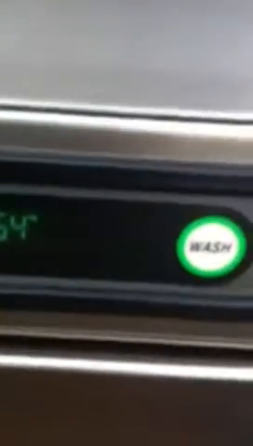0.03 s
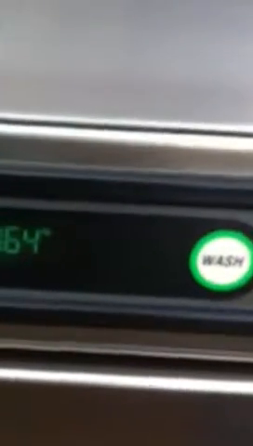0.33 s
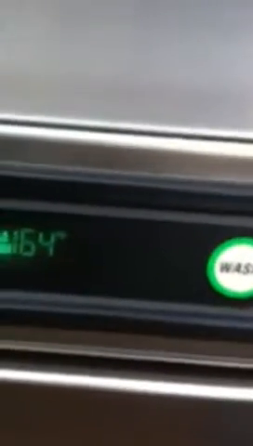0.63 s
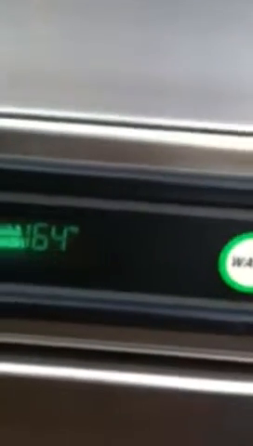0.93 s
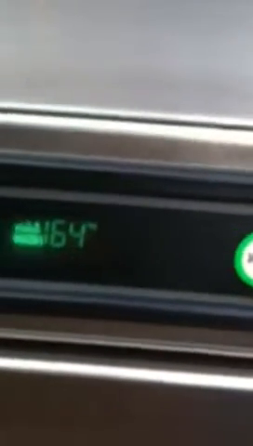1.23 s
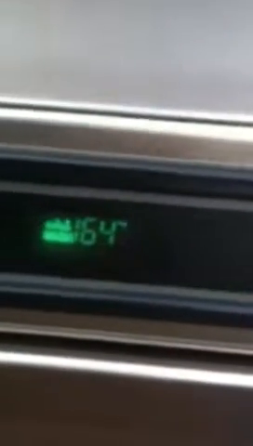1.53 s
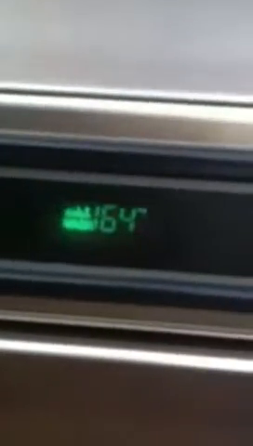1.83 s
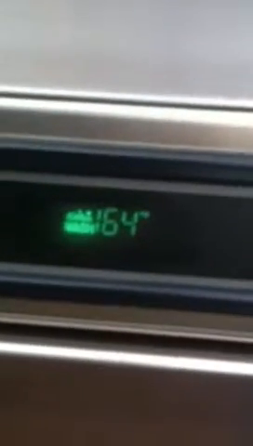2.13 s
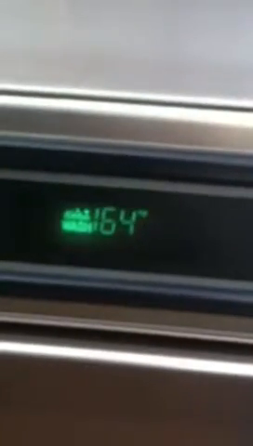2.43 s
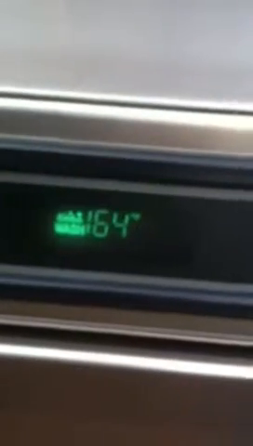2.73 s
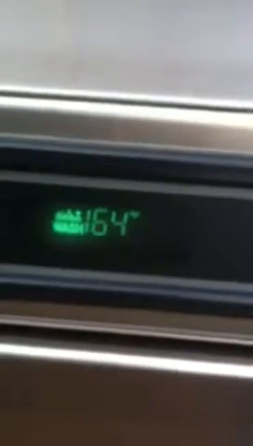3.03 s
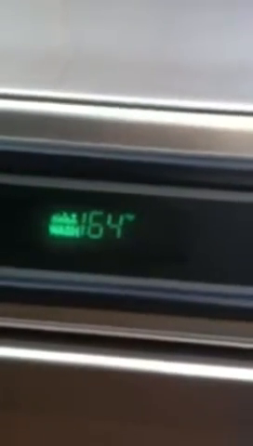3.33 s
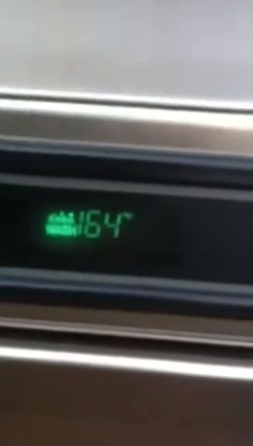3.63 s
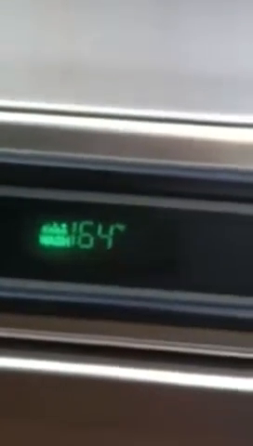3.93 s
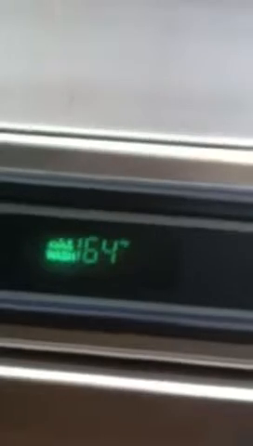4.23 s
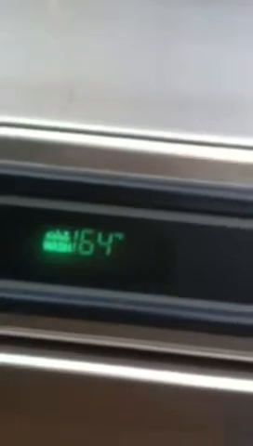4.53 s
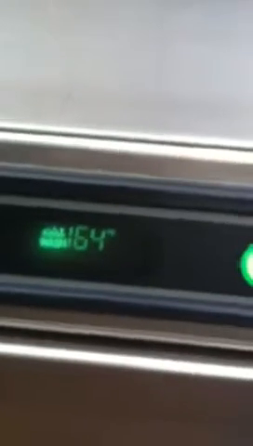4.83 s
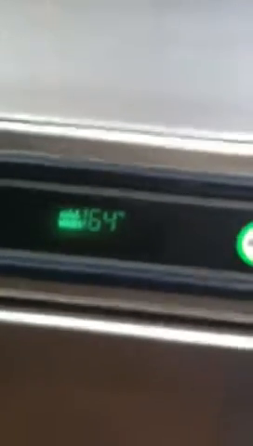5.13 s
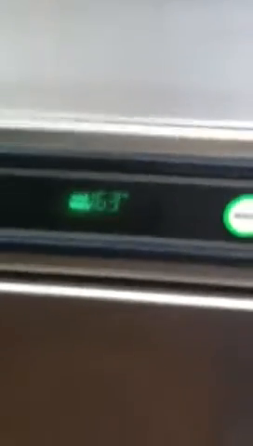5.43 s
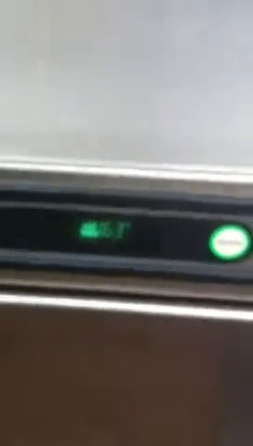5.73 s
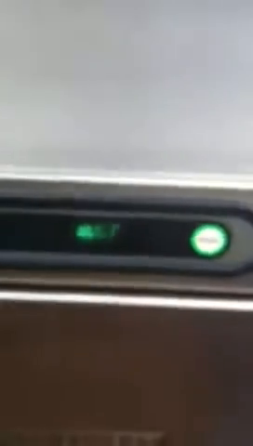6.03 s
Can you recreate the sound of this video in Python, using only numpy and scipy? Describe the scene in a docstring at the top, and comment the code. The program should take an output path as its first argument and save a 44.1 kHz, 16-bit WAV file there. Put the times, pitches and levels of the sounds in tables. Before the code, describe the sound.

A commercial dishwasher starts with a hum and a rush of water on steel, then sprays steadily, with one sharp metal clack.

```python
"""A commercial dishwasher starts its wash, heard on one microphone close to the steel door.
A relay ticks, the pump hums up and the cabinet shudders. The jets spit, rush on the bare steel, then
settle to a steady spray: fine drops hiss and heavy ones patter over the rumble of churning water.
About two seconds in, one sharp clack rings the door and makes the recorder's gain duck and creep back."""
import sys
import numpy as np
from scipy import signal
from scipy.fft import rfft, irfft, next_fast_len
from scipy.io import wavfile
from scipy.ndimage import uniform_filter1d, map_coordinates

SR = 44100
rng = np.random.default_rng(int(sys.argv[2]) if len(sys.argv) > 2 else 0)


def wav_record(signal):
    """Record a signal, one row per channel, as 16-bit PCM in the file named by sys.argv[1]."""
    frames = np.transpose(np.atleast_2d(signal))
    bounded = np.clip(frames, -1, 1)
    # unit amplitude maps onto the largest positive 16-bit level
    quanta = np.round(bounded * 32767).astype(np.int16)
    wavfile.write(sys.argv[1], SR, quanta)


N = 268392
TIME = np.arange(N) / SR
MOTOR_ON_S, SPIN_UP_S = 0.06, 0.056  # the motor starts; time constant of its speed


def amp(db):
    """Decibels to gain."""
    return 10 ** (np.asarray(db) / 20)


def unit(x):
    """Scale to rms 1."""
    return x / np.sqrt(np.mean(x ** 2) + 1e-20)


def since(start):
    """Seconds after start, zero before it."""
    return np.maximum(TIME - start, 0)


def ramp(start, length):
    """A straight rise from 0 to 1."""
    return np.minimum(since(start) / length, 1)


def swell(start, attack, hold, fade_db_per_s):
    """Gain that rises, holds and dies away."""
    return ramp(start, attack) * amp(-fade_db_per_s * since(start + attack + hold))


def wobble(rate):
    """A smooth random curve, rate knots a second."""
    coarse = np.arange(0, N + 32, 32)
    knots = rng.standard_normal(int(N * rate / SR) + 4)
    return np.interp(np.arange(N), coarse, map_coordinates(knots, [coarse * rate / SR]))


def wavering_phase(hz, depth, rate):
    """Phase in radians of a pitch that wanders by the fraction depth."""
    return 2 * np.pi * np.cumsum(hz * (1 + depth * wobble(rate))) / SR


def filtered(x, response):
    """Shape x by a gain that depends on frequency."""
    size = next_fast_len(len(x) + SR // 4)
    return irfft(rfft(x, size) * response(np.fft.rfftfreq(size, 1 / SR)), size)[:len(x)]


def colour(points, hz):
    """Gain of (Hz, dB) points joined on a log axis."""
    f, db = np.transpose(points)
    return amp(np.interp(np.log(hz + 1), np.log(f), db))


def below(hz, edge_hz, order=4):
    """Gain of a smooth low-pass."""
    return 1 / np.sqrt(1 + (hz / edge_hz) ** (2 * order))


def above(hz, edge_hz, order=4):
    """Gain of the matching high-pass."""
    return (hz / edge_hz) ** order * below(hz, edge_hz, order)


def bell(hz, centre_hz, width_hz):
    """Gain of one resonance with steep skirts."""
    return 1 / (1 + ((hz - centre_hz) / width_hz) ** 2)


def panel(hz, spacing_hz, depth_db):
    """The many close modes of a steel sheet ripple a spectrum."""
    knots = rng.standard_normal(SR // 10)
    return amp(depth_db * map_coordinates(knots, [hz / spacing_hz], mode="wrap"))


def noise(points, t):
    """Coloured noise of rms 1, as long as t."""
    return unit(filtered(rng.standard_normal(len(t)), lambda hz: colour(points, hz)))


def narrow_noise(centre_hz, width_hz):
    """Noise of rms 1 through one resonance."""
    return unit(filtered(rng.standard_normal(N), lambda hz: bell(hz, centre_hz, width_hz)))


def ring(modes, t):
    """Damped modes, each starting at a random phase."""
    return sum(amp(db - 60 * t / t60) * np.sin(2 * np.pi * (hz * t + rng.random()))
               for hz, db, t60 in modes)


def drops(rate, spread_db, mist):
    """Random impacts of uneven size, over a mist of drops too small to tell apart."""
    hits = (rng.random(N) < rate / SR) * rng.choice([-1, 1], N)
    sizes = amp(spread_db * rng.standard_normal(N))
    return unit(unit(hits * sizes) + mist * rng.standard_normal(N))


# Room tone of the kitchen. Each row: frequency in Hz, spectral level in dB.
ROOM_TONE = [(30, -21), (150, -9), (400, -8.5), (1200, -16), (6500, -14), (15000, -33)]

def kitchen(level_db=-62):
    """The faint steady air of the room around the microphone."""
    return amp(level_db) * noise(ROOM_TONE, TIME)


# The relay's modes. Each row: frequency in Hz, relative level in dB, t60 in seconds.
RELAY_MODES = [(3950, -11, 0.04), (4600, -9, 0.04), (5050, -9, 0.035), (5700, -8, 0.04), (6200, -4, 0.04),
               (7230, -1, 0.045), (7750, -5, 0.04)]

def relay(start_s=0.0449, level_db=-31, sizzle_db=-3, t60=0.04, attack_s=0.0007):
    """The small relay snaps shut and rings with its own modes."""
    t = since(start_s)
    bright = filtered(noise(HISS_SPECTRUM, t), lambda hz: above(hz, 2200, order=2))
    sizzle = amp(sizzle_db - 60 * t / t60) * bright
    return amp(level_db) * (1 - np.exp(-t / attack_s)) * (ring(RELAY_MODES, t) + sizzle)


def load(hold_s=0.81, release_s=0.73):
    """The pump's extra effort, 1 while it sets the water moving and 0 once it runs freely."""
    return 1 - ramp(MOTOR_ON_S + hold_s, release_s)


# Tones of the pump shaft. Each row: multiple of its speed, rms level in dB, change under load in dB.
SHAFT_TONES = [(2, -62.5, 0), (3, -55.5, -5), (4, -62, 3), (6, -55.5, 3), (10, -62, -2), (14, -70, 8)]

def pump(mains_hz=60, shaft_hz=59.07, hum_db=-52.5, hum_load_db=8, rough_db=-14):
    """The motor hums at twice the mains, louder under load; its shaft spins up and wavers."""
    speed = 1 - np.exp(-since(MOTOR_ON_S) / SPIN_UP_S)
    angle = wavering_phase(shaft_hz * speed, depth=0.001, rate=5)
    shaft = sum(amp(db + load_db * load() + 2.7 * wobble(4.48)) * np.sin(round(multiple) * angle)
                for multiple, db, load_db in SHAFT_TONES)
    rough = amp(rough_db) * narrow_noise(2 * mains_hz, width_hz=14)
    hum_gain = amp(hum_db + hum_load_db * load() + 1.1 * wobble(15))
    hum = hum_gain * (np.sin(2 * np.pi * 2 * mains_hz * TIME) + rough)
    return np.sqrt(2) * (speed ** 2 * hum + speed ** 4 * shaft)


def drone(tone_hz=256, level_db=-55, rise_s=0.073):
    """A faint wavering tone that comes up with the hum."""
    gain = ramp(MOTOR_ON_S, rise_s) * amp(level_db + 4.3 * wobble(3.94))
    return gain * np.sin(wavering_phase(tone_hz, depth=0.0024, rate=5.94))


# Churning water, heard through the cabinet. Each row: frequency in Hz, spectral level in dB.
SLOSH_SPECTRUM = [(25, -34), (45, -23), (85, -13), (125, -4.5), (153, 5), (195, 0), (215, 1), (262, 1.5),
                  (310, -0.5), (368, -4.5), (392, 2.5), (480, -5), (680, -6), (800, -5.5), (1100, -12),
                  (1250, -16.5), (1650, -13)]

def slosh(level_db=-43, load_db=1.4, rise_s=0.084):
    """Water drums and sloshes in the cabinet as the pump gets it moving."""
    cabinet = lambda hz: (colour(SLOSH_SPECTRUM, hz) * below(hz, 2400)
                          * panel(hz, spacing_hz=21.96, depth_db=1.64))
    water = unit(filtered(drops(rate=1500, spread_db=1.5, mist=1.2), cabinet))
    return ramp(MOTOR_ON_S, rise_s) * amp(level_db + load_db * load() + wobble(16)) * water


# The cabinet's low panel modes. Each row: frequency in Hz, t60 in seconds.
CABINET_MODES = [(128, 0.25), (260, 0.12), (388, 0.18)]
# Jolts as the motor starts and water hits the arms.
# Each row: start in seconds, then levels of the low, middle and high mode in dB.
CABINET_JOLTS = [(.064, -60, -41, -42), (.14, -43, -42.5, -42), (.188, -45, -52, -50)]

def shudder(attack_s=0.027, hold_s=0.018, rattle_db=1):
    """Each jolt swells the cabinet's low panel modes, which waver in pitch and rattle."""
    out = np.zeros(N)
    for start, *levels in CABINET_JOLTS:
        for (hz, t60), db in zip(CABINET_MODES, levels):
            tone = unit(np.sin(wavering_phase(hz, depth=0.038, rate=29.8) + 2 * np.pi * rng.random()))
            rattle = amp(rattle_db) * narrow_noise(hz, width_hz=hz / 4)
            out += amp(db) * swell(start, attack_s, hold_s, 60 / t60) * unit(tone + rattle)
    return out


def spit(start_s=0.1573, rise_s=0.0058, t60=0.092, level_db=-30, crisp_db=-4):
    """Trapped air spits the first water out of the nozzles."""
    crisp = lambda hz: (colour(HISS_SPECTRUM, hz) * above(hz, 3800)
                        * (1 + amp(crisp_db) * above(hz, 11000)))
    spray = unit(filtered(drops(rate=1500, spread_db=3, mist=0.6), crisp))
    return amp(level_db) * swell(start_s, rise_s, 0, 60 / t60) * spray


def door(hz, width_hz=200, lift_db=0.9):
    """The door passes the spray to the microphone a little better around its own modes."""
    return amp(lift_db * sum(bell(hz, mode_hz, width_hz) for mode_hz, _, _ in DOOR_MODES))


def patchy(x, depth_db):
    """The turning arms sweep ever new spots, so each band swells and fades on its own."""
    bands = signal.stft(x, nperseg=512)[2]
    patches = uniform_filter1d(rng.standard_normal(bands.shape), size=14, axis=0)
    patches = unit(uniform_filter1d(patches, size=8, axis=1))
    return unit(signal.istft(bands * amp(depth_db * patches), nperseg=512)[1][:N])


# Rushes of the jets on bare steel. Each row: start, attack and hold in seconds,
# fade in dB per second, hiss level in dB, patter level in dB.
JET_RUSHES = [(0.229, 0.09, .175, 98, -25.5, -38.5), (0.503, 0.055, 0.14, 18, -23.5, -34.5),
              (1.885, 0.065, 0.075, 40, -41.5, -46)]

def spray_gain(steady_db, rush_dbs, lag_s=0, jets_on_s=0.19, rise_s=0.067, dribble_db=-16.5):
    """A dribble until the nozzles fill, then the rushes, which die down into the steady spray."""
    pressure = ramp(jets_on_s, rise_s)
    dribble = amp(dribble_db) * ramp(MOTOR_ON_S, SPIN_UP_S) * (1 - pressure)
    rushes = [amp(db) * swell(start, attack + lag_s, hold - lag_s, fade)
              for (start, attack, hold, fade, _, _), db in zip(JET_RUSHES, rush_dbs)]
    return np.linalg.norm([amp(steady_db) * (pressure + dribble), *rushes], axis=0)


# Fine drops on steel; the spit, relay and clack share this colour.
# Each row: frequency in Hz, spectral level in dB.
HISS_SPECTRUM = [(3000, -8.5), (4300, -11.5), (5500, -5.5), (6250, 0), (6900, 0), (8000, -5), (9300, -9),
                 (12400, -22.5), (14700, -24), (16000, -30)]
# Heavy drops on steel. Each row: frequency in Hz, spectral level in dB.
PATTER_SPECTRUM = [(1300, -12), (1900, -16.5), (2300, -12), (2950, -7), (3400, -8.5), (4000, -10.5),
                   (6000, -6)]
# Jets slap a wall. Each row: peak time in seconds, hiss level in dB, patter level in dB.
WALL_SLAPS = [(.17, -33, -46), (.265, -34, -36.5), (.338, -30, -41), (.57, -41, -35.5), (.97, -26.5, -49),
              (1.145, -27.5, -38.5), (1.588, -34, -43), (3.24, -35, -47), (4.27, -46, -45), (4.6, -47, -46),
              (5.43, -36, -43), (5.63, -50, -44), (5.848, -37, -54)]
# The turning arms leave uneven gaps in the spray on the door. Each row: centre in seconds, depth in dB.
SPRAY_GAPS = [(.93, 1), (1.44, 2), (1.84, 1.5), (2.22, 2.2), (2.57, 1.7), (3.05, 1), (3.4, 1.8),
              (3.77, 2.1), (4.22, 1), (4.66, 1.8), (4.98, 1.8), (5.34, 1.5), (5.69, 2.5), (6.06, 3)]

def jets(hiss_db=-38, patter_db=-45.5, gap_half_s=0.058, slap_rise_s=0.053, slap_t60=0.16):
    """The wash arms spray the steel: fine drops hiss, heavy ones patter, both flutter with the jets."""
    flutter_db = 0.35 * wobble(20) + 0.5 * wobble(70)
    fine = lambda hz: (colour(HISS_SPECTRUM, hz) * above(hz, 4700)
                       * door(hz) * panel(hz, spacing_hz=39, depth_db=1.9))
    heavy = lambda hz: (colour(PATTER_SPECTRUM, hz) * above(hz, 1530) * below(hz, 4570)
                        * door(hz) * panel(hz, spacing_hz=50.6, depth_db=1))
    hiss = patchy(filtered(drops(rate=5000, spread_db=1, mist=0.96), fine), depth_db=0.66)
    patter = patchy(filtered(drops(rate=2000, spread_db=1, mist=0.99), heavy), depth_db=0.84)
    slap = lambda s: amp(-60 * np.maximum((s - TIME) / slap_rise_s, (TIME - s) / slap_t60))
    slap_hiss, slap_patter = sum(np.outer(amp(levels), slap(s)) for s, *levels in WALL_SLAPS)
    gap_db = sum(db * np.exp(-((TIME - s) / gap_half_s) ** 2) for s, db in SPRAY_GAPS)
    *_, rush_hiss_db, rush_patter_db = np.transpose(JET_RUSHES)
    # The fine mist builds more slowly in a rush; the patter dips further in a gap.
    hiss_gain = spray_gain(hiss_db, rush_hiss_db, lag_s=0.02) * amp(flutter_db - gap_db)
    patter_gain = spray_gain(patter_db, rush_patter_db) * amp(flutter_db - 1.66 * gap_db)
    return np.hypot(hiss_gain, slap_hiss) * hiss + np.hypot(patter_gain, slap_patter) * patter


# Bumps from inside the cabinet. Each row: start in seconds, level in dB.
CABINET_THUDS = [(.38, -52), (.58, -56), (.79, -58), (1.15, -55), (1.31, -58), (2.03, -49), (5.73, -59)]

def thuds(pitch_hz=64, scatter=0.1, rise_s=0.008, t60=0.16):
    """Soft, deep bumps in the cabinet, each at a slightly different pitch."""
    pitches = pitch_hz * (1 + scatter * rng.standard_normal(len(CABINET_THUDS)))
    return sum(amp(db) * swell(start, rise_s, 0, 60 / t60) * np.sin(2 * np.pi * hz * since(start))
               for (start, db), hz in zip(CABINET_THUDS, pitches))


# Swells of the tank's low boom. Each row: peak time in seconds, rms level in dB.
TANK_SWELLS = [(.46, -48), (1.25, -40), (1.83, -45), (1.94, -44), (3.31, -40), (3.51, -46), (4.06, -46.5),
               (4.211, -46), (4.52, -44.5), (4.75, -45), (4.89, -41), (5.1, -45.5), (5.25, -48),
               (5.38, -45), (5.58, -46), (6.04, -45.5)]

def tank_boom(boom_hz=177, murmur_db=-51, build_s=4.3, swell_half_s=0.045):
    """The tank's low resonance builds to a murmur and booms in brief swells now and then."""
    murmur = ramp(MOTOR_ON_S, build_s) * amp(murmur_db) * narrow_noise(boom_hz, width_hz=11)
    tone = unit(np.sin(wavering_phase(boom_hz, depth=0.01425, rate=12)))
    swells = sum(amp(db) * np.exp(-((TIME - s) / swell_half_s) ** 2) for s, db in TANK_SWELLS)
    return murmur + swells * tone


# The steel door's modes. Each row: frequency in Hz, relative level in dB, t60 in seconds.
DOOR_MODES = [(4220, -6, 0.027), (4500, -17, 0.035), (4950, -5, 0.023), (5128, -1, 0.022), (5953, 2, 0.041),
              (6220, -8, 0.035), (6480, -9.5, 0.036), (6760, -8, 0.055), (6820, -5, 0.076),
              (7550, -21, 0.04), (9200, -6, 0.019)]
# The short knock of a contact. Each row: frequency in Hz, relative level in dB, t60 in seconds.
KNOCK_MODES = [(2740, -7, 0.017), (3180, 0, 0.016)]
# The dry crack of a contact. Each row: frequency in Hz, spectral level in dB.
CRACK_SPECTRUM = [(35, -45), (70, -24), (110, -13), (260, -17), (350, -4), (480, 7), (850, -20),
                  (1200, 2.5), (1650, -12), (2100, -9), (2700, 8), (3500, 1.5), (4300, 10.5), (7000, 7),
                  (10000, -5.5), (16000, -16)]
# Contacts of the clack. Each row: start in seconds, level in dB,
# relative levels of crack, ring and knock in dB, the crack's t60 in seconds.
CLACK_CONTACTS = [(2.048, -15, 10.5, -13, -1, 0.024), (2.0512, -16, 3, -9, -12, 0.028),
                  (2.0552, -10.5, 3.5, -4.5, -20, 0.019), (2.0568, -12, -6, -1, -26, 0.02)]

def clack(snap_db=-3, snap_t60=0.0036, sizzle_db=-6, room_db=-24, room_t60=0.22, attack_s=0.00055):
    """Each contact snaps, cracks, knocks, rings the steel and leaves a short tail in the room."""
    out, t = np.zeros(N + SR), np.arange(SR // 4) / SR
    onset = 1 - np.exp(-t / attack_s)
    for start, db, crack_db, ring_db, knock_db, t60 in CLACK_CONTACTS:
        modes = amp(ring_db) * ring(DOOR_MODES, t) + amp(knock_db) * ring(KNOCK_MODES, t)
        crack = amp(crack_db - 2.5 - 60 * t / t60) * noise(CRACK_SPECTRUM, t)
        sizzle = amp(sizzle_db - 60 * t / t60) * noise(HISS_SPECTRUM, t)
        snap = amp(snap_db - 60 * t / snap_t60) * rng.standard_normal(len(t))
        tail = amp(room_db - 60 * t / room_t60) * noise(HISS_SPECTRUM, t)
        out[round(start * SR):][:len(t)] += amp(db) * (onset * (modes + crack + sizzle + tail) + snap)
    return filtered(out[:N], lambda hz: above(hz, 110, order=2))  # the clack is heard with little deep bass


def scene():
    """One microphone close to the door, the same on both channels."""
    sound = (kitchen() + relay() + pump() + drone() + slosh() + shudder()
             + spit() + jets() + thuds() + tank_boom() + clack())
    return np.array([sound, sound])


def gain_control(x, threshold_db=-17, attack_s=0.017, release_s=0.94):
    """The recorder's gain drops quickly by a loud sound's excess and recovers slowly."""
    level_db = 10 * np.log10(np.abs(uniform_filter1d(x ** 2, size=SR // 200)) + 1e-12)
    excess_db = np.maximum(level_db - threshold_db, 0)
    fade = np.exp(-TIME / release_s)
    held_db = fade * np.maximum.accumulate(excess_db / fade)
    pole = np.exp(-1 / (attack_s * SR))
    return amp(-signal.lfilter([1 - pole], [1, -pole], held_db))


def record(dry):
    """The recorder rides its gain, thins the deep bass and keeps nothing above its band limit."""
    passband = lambda hz: above(hz, 41, order=3) * (hz < 15800)
    return np.array([filtered(x * gain_control(x), passband) for x in dry])


dry = scene()
out = record(dry)
wav_record(out)
```